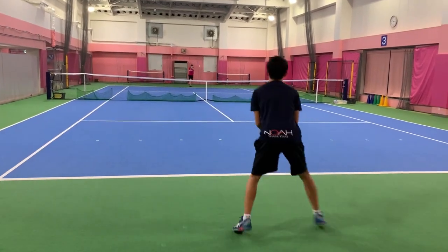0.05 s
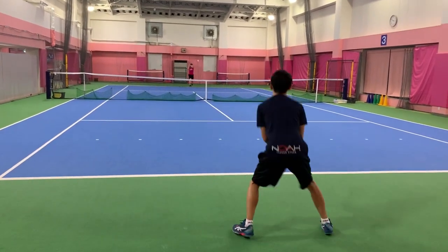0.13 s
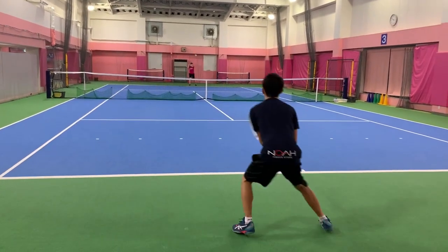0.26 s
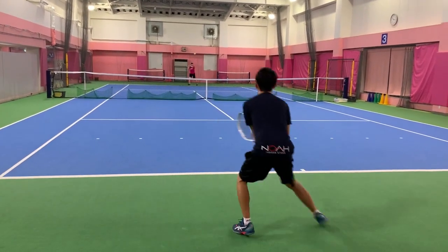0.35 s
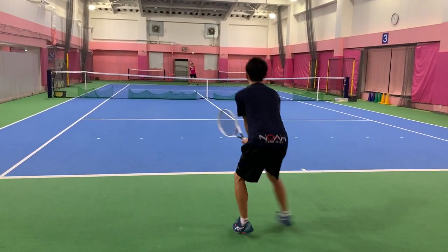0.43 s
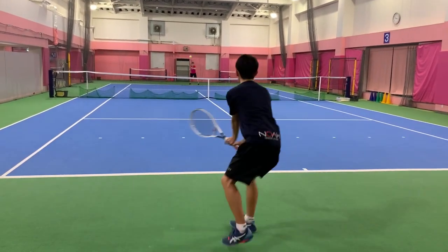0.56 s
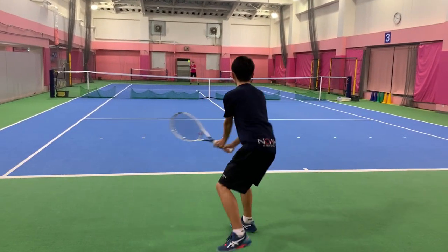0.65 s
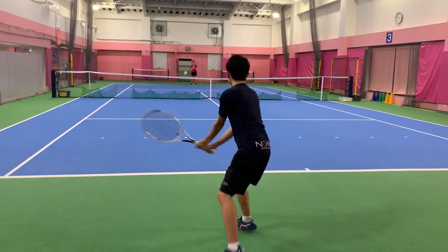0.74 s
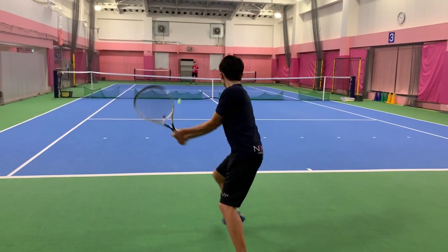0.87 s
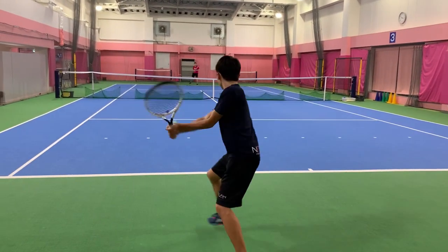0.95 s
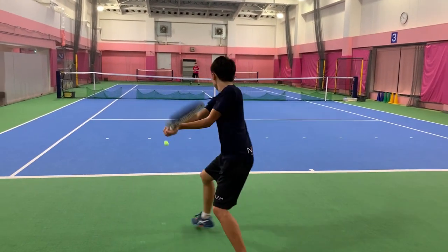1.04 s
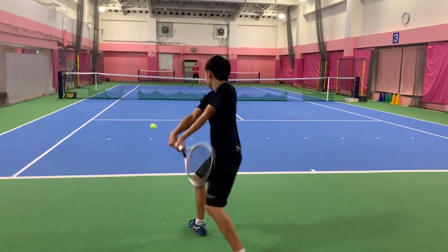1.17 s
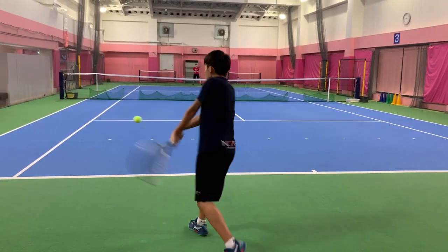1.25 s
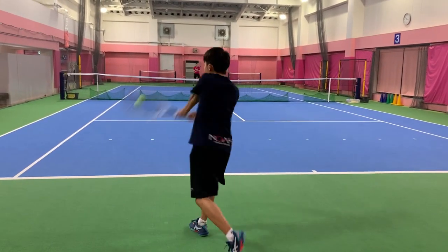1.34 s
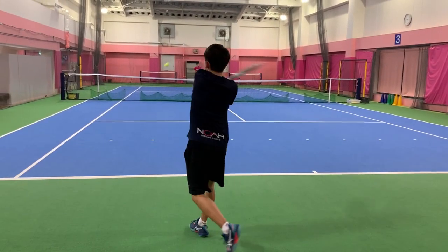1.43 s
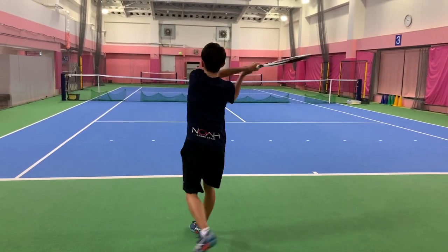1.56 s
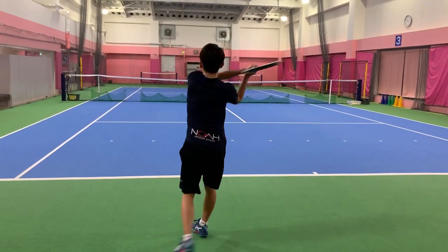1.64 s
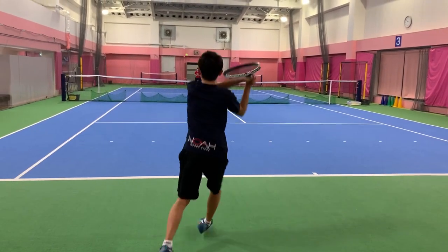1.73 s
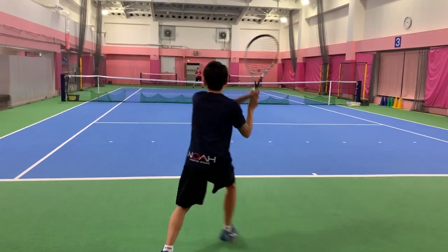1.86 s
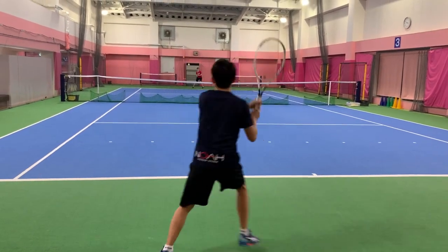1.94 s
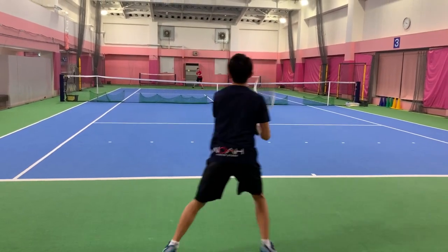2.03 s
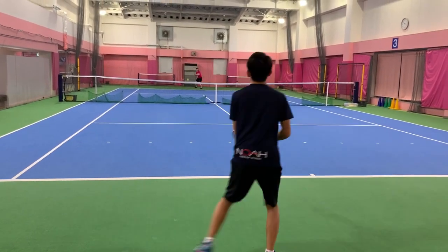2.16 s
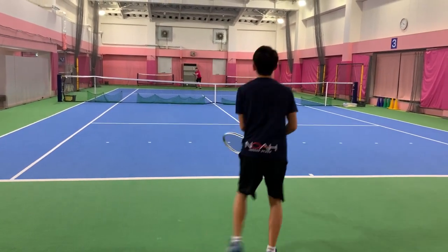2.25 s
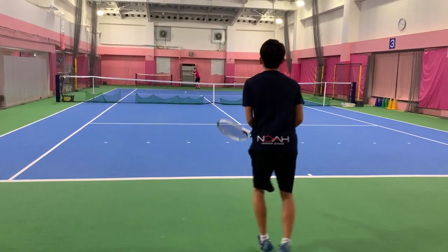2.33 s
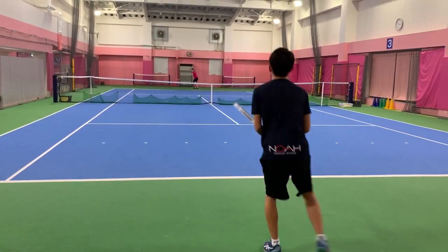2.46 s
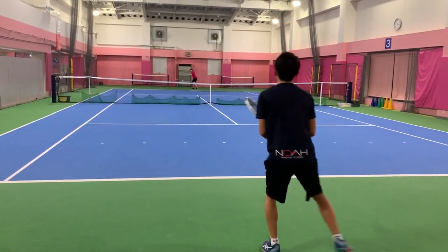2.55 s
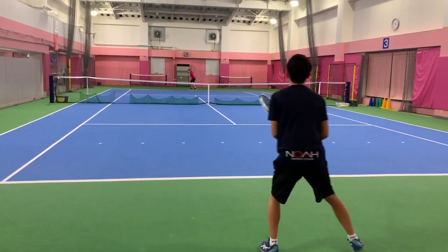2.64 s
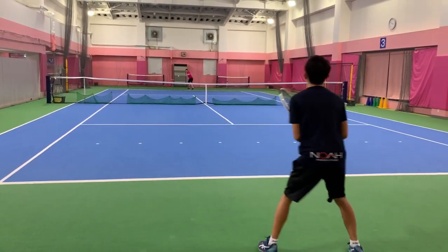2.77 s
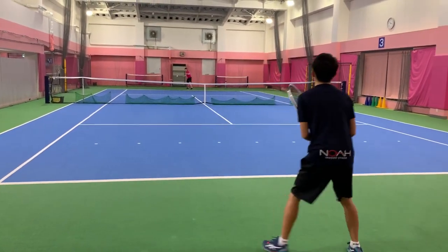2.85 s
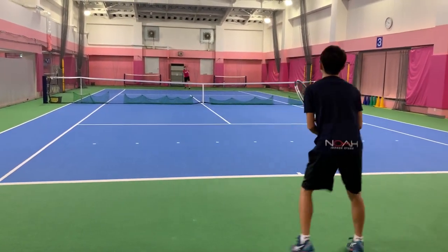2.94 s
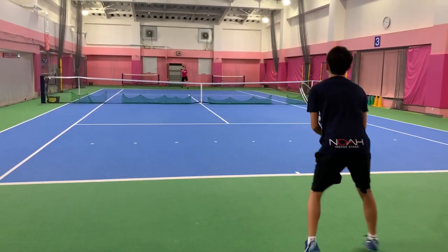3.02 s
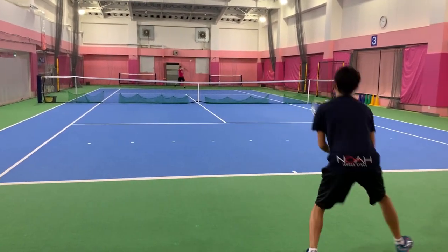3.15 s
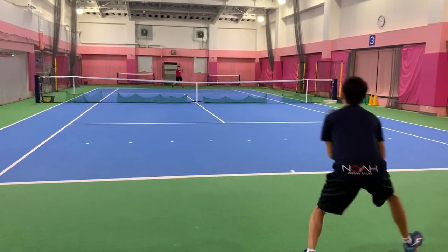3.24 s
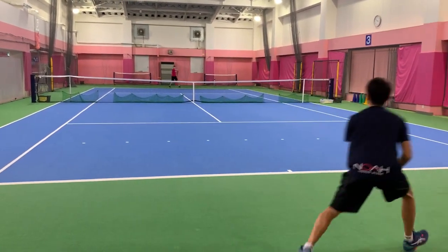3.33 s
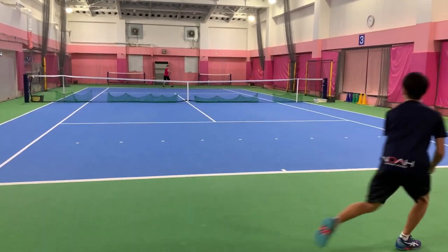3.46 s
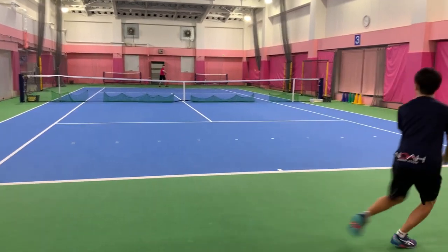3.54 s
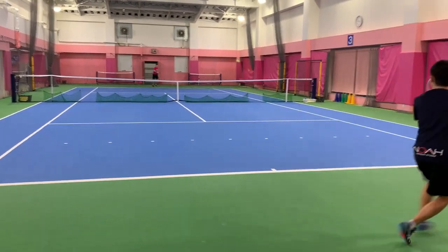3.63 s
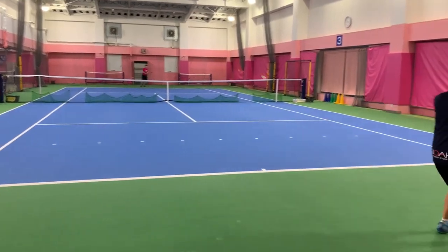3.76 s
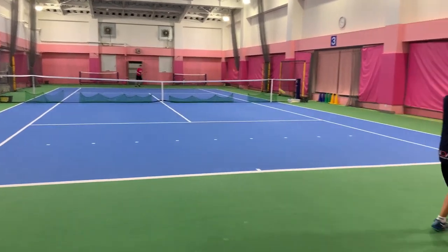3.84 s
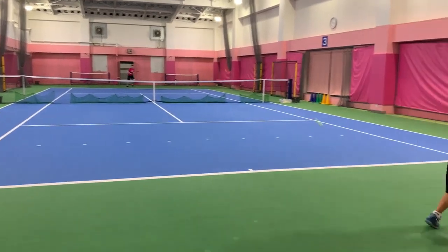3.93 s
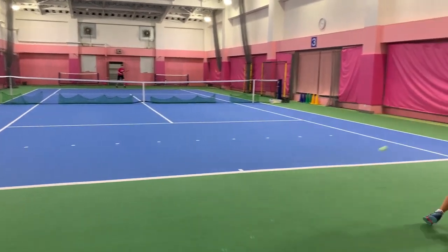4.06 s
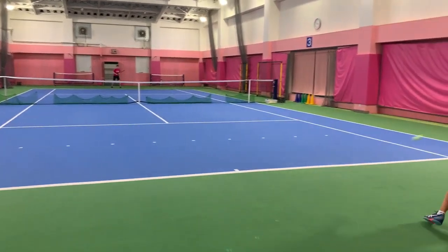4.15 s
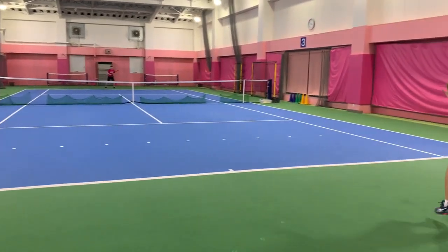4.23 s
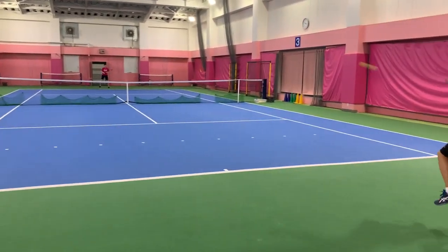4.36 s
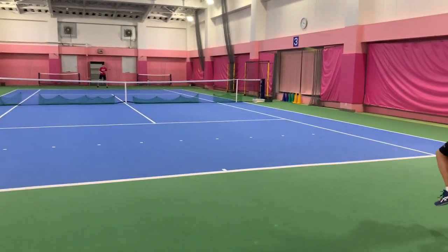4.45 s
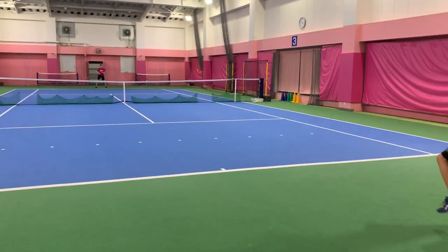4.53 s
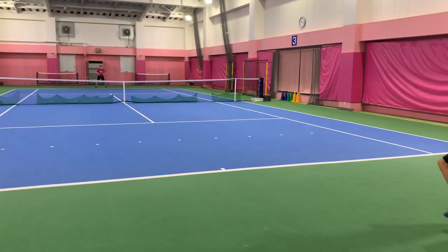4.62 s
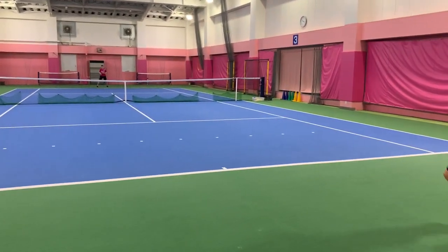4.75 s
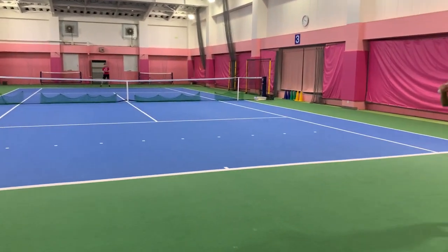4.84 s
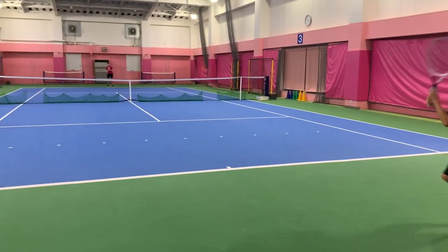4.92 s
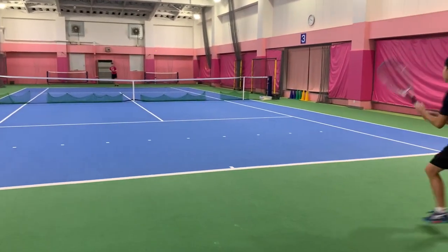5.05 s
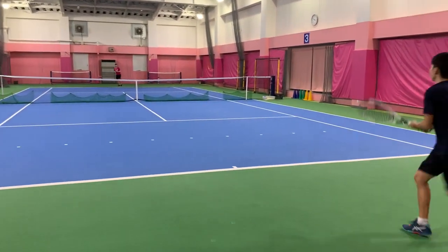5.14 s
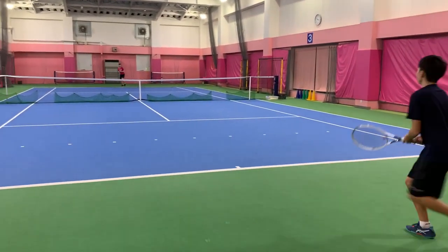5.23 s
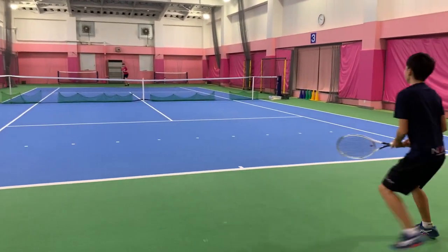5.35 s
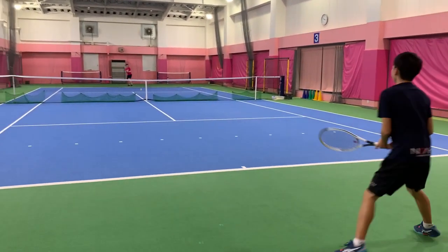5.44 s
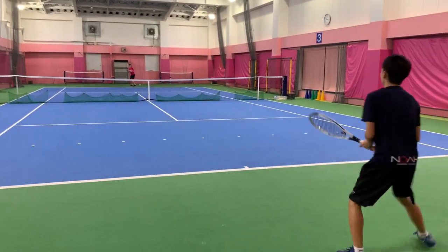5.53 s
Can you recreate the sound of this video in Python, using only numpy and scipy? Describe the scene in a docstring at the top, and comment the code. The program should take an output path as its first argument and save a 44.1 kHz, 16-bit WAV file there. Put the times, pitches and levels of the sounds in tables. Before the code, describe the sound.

A tennis rally is heard from behind the near baseline of a large, reverberant indoor hall, with a low ventilation hum throughout. Right at the start, a distant racket hits the ball with a hollow, echoing pop. The ball bounces nearby at about 1.1 seconds, hissing very faintly in flight, and the near player strikes it at 1.4 with a loud, crisp crack and thump. A footfall and scuff follow at 1.8. A faint far bounce comes at 2.5, then the distant racket knocks again at 3.1. The ball bounces on the near side at 4.1 and is hit at 4.4 with a bright pock and a brief ring of strings. Each stroke slaps off the walls and dies away over about two seconds. Soft footsteps pad throughout, ending with a few light sole scuffs between 5.2 and 5.6 seconds.

```python
"""Racket strokes of a tennis rally in a big indoor hall, heard from behind the near baseline.
Far and near players strike in turn. Each impact excites a thump of string bed and frame, the knock and
hollow pock of the ball, a short ring of the racket and a crack of felt; walls and a long reverberation
return them. The ball bounces and hisses in flight, shoes pad and scuff, and the ventilation hums."""
import sys
import numpy as np
from scipy import signal
from scipy.fft import rfft, irfft, next_fast_len
from scipy.io import wavfile
from scipy.ndimage import map_coordinates

SR = 44100
rng = np.random.default_rng(int(sys.argv[2]) if len(sys.argv) > 2 else 0)


def unload_wav(signal):
    """Save mono or channel-first audio to the path in sys.argv[1] as 16-bit WAV at rate SR, clipped to [-1, 1]."""
    wavfile.write(
        sys.argv[1],
        SR,
        np.round(np.clip(np.atleast_2d(signal).T, -1, 1) * 32767).astype(np.int16),
    )


N = 246512
BALL_HZ = 900  # the ball's pitch on the court


def rackets(critical_m=2.61, dwell_s=0.00334):
    """Impact excitation: felt cracks on the strings, then bed, frame and ball sound as they part."""
    # strokes: t/s, force/dB, bed f/Hz, frame f/Hz, frame level/dB, ball f/Hz, pock level/dB,
    # knock level/dB, lowest string f/Hz, favoured string f/Hz, its lift/dB, ping f/Hz, tilt/(dB/octave)
    strokes = [(0.0439, 0, 340, 171, -43.5, 997, -36, -29.5, 598, 3310, 9.5, 6040, -2.5),
               (1.3955, 3.5, 407, 160, -37.5, 959, -33, -42, 594, 1730, 0, 5900, -0.4),
               (3.0722, 2, 343, 166.6, -40.5, 980, -29.5, -25, 601.7, 1375, 4, 6000, -6.5),
               (4.3607, -1.8, 353, 217, -32.5, 942, -36.5, -44, 590.4, 2740, 9, 6500, -1)]
    # their paths: distance/m, thud gain into the hall/dB, direct crack gain/dB, wall delay/s,
    # wall gain/dB, end wall delay/s, end wall gain/dB, lag of the right channel/ms
    paths = [(25.4, -0.5, -4, 0.034, -1.5, .115, -11, 0.17), (4.27, -2, 3.5, 0.021, 2, 0.21, -10, 0.094),
             (19.9, -1, 2, 0.043, -5.5, .11, -16.5, 0.092), (9.1, -1.5, 6, .034, 0.5, 0.15, -13.5, -0.364)]
    out = np.zeros((2, N))
    dwell = round(dwell_s * SR)  # the ball's time on the strings
    for stroke, path in zip(strokes, paths):
        s, force_db, bed_hz, flex_hz, flex_db, ball_hz, pock_db, knock_db = stroke[:8]
        tuning_hz, favoured_hz, lift_db, ping_hz, tilt_db = stroke[8:]
        metres, boom_db, crack_db, wall_s, echo_db, end_s, end_db, lag_ms = path
        decades = np.log10(metres / critical_m)  # direct sound equals the echo at the critical distance
        direct_db = -19.5 * decades
        wall_db = 2.5 - 12.5 * decades + echo_db
        swell_s = 0.0018 * amp(1.15 * force_db)  # a harder stroke sinks deeper and thumps longer
        bed = amp(-30 + 0.66 * force_db) * thump(bed_hz, swell_s, push=0.25)
        frame = amp(flex_db) * thump(flex_hz, swell_s=0.0033, push=0)
        thud = np.roll(bed + frame, dwell)
        shell = thump(hz=1040, swell_s=0.0011, push=0.3)  # the ball's shell snaps back
        knock = amp(knock_db) * np.roll(shell, dwell)
        pock = amp(pock_db) * ball(ball_hz, start_s=0.002932, attack_s=0.0018)
        twang = amp(-46 + 1.46 * force_db) * strings(tuning_hz, favoured_hz, lift_db, tilt_db)
        click = amp(-37 + 0.11 * force_db) * crack(tilt_db)
        body = thud + pock + twang
        felt = amp(crack_db) * scrape(click, direct_db, ping_hz)
        direct = thud + knock + amp(-4) * (pock + twang) + felt
        add(out, s, placed(over_court(direct, direct_db), pan_db=0, lag_ms=lag_ms))
        add(out, s, amp(wall_db) * wall(body + amp(-9.5) * knock + click, wall_s))
        add(out, s, amp(end_db) * end_wall(body + click, end_s))
        # each part radiates in its own directions and so finds its own paths through the hall
        for part in (amp(boom_db) * thud, pock, twang, click):
            add(out, s, hall(part))
    return out


def thump(hz, swell_s, push):
    """Damped oscillation of a soft contact: a few cycles swell and die over a slower push of air."""
    t = clock(SR // 8)
    u = t / swell_s
    phase = 2 * np.pi * hz * (t - swell_s)
    return burst(u ** 2 * np.exp(-2 * u) * (np.sin(phase) + push * np.sin(phase / 2)))


def ball(hz, start_s, attack_s):
    """Resonance of a hollow ball: close, short-lived modes make the pock."""
    # ball modes: ratio to the pitch, level/dB, T60/s
    modes = [(0.811, -17, 0.074), (0.899, -10, 0.055), (0.999, -6.5, 0.06), (1.08, -8.5, 0.053),
             (1.19, -1, 0.014), (1.42, -17.5, 0.01)]
    return ring([(ratio * hz, db, t60) for ratio, db, t60 in modes], start_s, attack_s)


def strings(tuning_hz, favoured_hz, lift_db, tilt_db, band_octaves=0.12):
    """Normal modes: tension tunes them, the contact spot favours some, the stroke's tilt dulls the top."""
    # string and frame modes: f/Hz, level/dB, T60/s
    modes = [(597, -2, 0.09), (1518, -2, 0.037), (1729, -0.5, 0.035), (2025, -1.5, 0.018),
             (2353, -1, 0.034), (2652, -10.5, 0.031), (3148, -5.5, 0.045), (3385, -12.5, 0.029),
             (3777, -10.5, 0.042), (4500, -13, 0.045), (4770, -14, 0.038), (5950, -17, 0.013),
             (6240, -13.5, 0.013)]
    lift = lambda hz: lift_db * np.exp(-(np.log2(hz / favoured_hz) / band_octaves) ** 2)
    dulled = lambda hz: tilt_db * np.log2(max(hz / 2400, 1))
    ratio = tuning_hz / modes[0][0]
    tuned = [(hz * ratio, db + lift(hz) + dulled(hz), t60) for hz, db, t60 in modes]
    return ring(tuned, start_s=0.002022, attack_s=0.00023)


def ring(modes, start_s, attack_s):
    """Modal superposition: exponentially damped sines of alternating sign."""
    t = np.maximum(clock(SR // 8) - start_s, 0)
    tones = sum(amp(db - 60 * t / t60) * np.sin(2 * np.pi * hz * t) * (-1) ** k
                for k, (hz, db, t60) in enumerate(modes))
    return burst(tones * (1 - np.exp(-t / attack_s)))


def crack(tilt_db):
    """Impulse of first contact: each stroke's own tilt sets how bright or dull it sounds."""
    # the crack as heard, with a narrow dip near 11.8 kHz: f/Hz, level/dB
    spectrum = [(300, 13.5), (1200, 6.5), (2000, -7), (4200, -3.5), (6000, -7.5), (7300, -6.5), (9800, -5),
                (11800, -23), (13500, -3.5), (16000, -18)]
    colour = lambda hz: amp(along(spectrum, hz) + tilt_db * np.log2(np.maximum(hz, 2200)))
    return burst(filtered(signal.unit_impulse(SR // 8, SR // 2000), colour))


def scrape(click, direct_db, ping_hz, fade_s=0.0025, ping_db=15.5, half_width_hz=300):
    """Friction: dragging felt draws the click out and makes the strings ping; air absorbs the top."""
    # colour of the crack at close range: f/Hz, gain/dB
    close = [(2000, 1), (4500, 1.5), (5300, -1), (7300, -1.5), (8200, 0.5), (9500, 7), (13500, 10.5)]
    u = clock(len(click)) / fade_s
    noises = rng.standard_normal((2, len(u)))
    mid, side = [burst(noise * np.sqrt(u) * np.exp(-u)) / np.sqrt(SR) for noise in noises]
    fibres = np.array([mid + 0.5 * side, mid - 0.5 * side])
    dragged = signal.fftconvolve(click[None], fibres, axes=1)[:, :len(u)]
    ping = lambda hz: ping_db / (1 + ((hz - ping_hz) / half_width_hz) ** 2)
    return filtered(dragged, lambda hz: amp(along(close, hz) + ping(hz) + direct_db * (hz / 10000) ** 2))


def over_court(x, direct_db, delay_s=0.007):
    """Comb filtering: the court's reflection joins the direct sound, its share growing with distance."""
    reflection = amp(-11 - 0.3 * direct_db)
    return amp(direct_db) * filtered(x, lambda hz: 1 + reflection * np.exp(-2j * np.pi * hz * delay_s))


def wall(x, delay_s, corner_s=0.012, spread_s=0.0098):
    """Specular reflection from the wall behind the player and its corner; fittings scatter the rest."""
    # wall reflection: f/Hz, gain/dB
    colour = [(150, -15), (380, -12.5), (520, -3), (700, -4), (1000, -3), (1600, -7.5), (4000, -1.5),
              (8000, -11), (14000, -17.5)]
    reflected = filtered(x, lambda hz: amp(along(colour, hz) - 2 * (hz / 3000) ** 2))
    mirror = placed(reflected, pan_db=-3.5, lag_ms=0.038)
    out = np.zeros((2, SR // 2))
    add(out, delay_s, amp(-6.5) * mirror)
    add(out, delay_s + corner_s, amp(-7.5) * mirror)
    add(out, delay_s, amp(-3) * scattered(x, colour, spread_s, SR // 8))
    return out


def end_wall(x, delay_s, spacing_m=45, trip_db=-12.5):
    """Echo between the end walls: a soft, smeared slap, and a fainter one a round trip later."""
    # end wall reflection: f/Hz, gain/dB
    colour = [(150, -17), (400, -13), (700, -2), (1000, -6), (2000, -22), (4000, -12), (10000, -33.5)]
    trip_s = 2 * spacing_m / 343  # sound travels at 343 m/s
    out = np.zeros((2, SR))
    for trip in range(2):
        slap = scattered(x, colour, spread_s=0.017, count=SR // 4)
        add(out, delay_s + trip * trip_s, amp(trip * trip_db) * slap)
    return out


def scattered(x, colour, spread_s, count):
    """Scattering: a dense cluster of small reflections smears the sound in time."""
    u = clock(count) / spread_s
    cluster = diffuse(colour, count) * burst(u * np.exp(-u)) / np.sqrt(SR)
    return signal.fftconvolve(x[None], cluster, axes=1)


def hall(x, early_db=1, early_t60=0.83, build_s=0.0083):
    """Reverberation: strong early reflections, then a long tail whose treble dies first."""
    # reverberation time: f/Hz, T60/s
    decay_times = [(100, 2.5), (300, 2.23), (1000, 2.52), (2000, 1.86), (3300, 1.42), (5000, 0.99),
                   (8000, 0.44), (14000, 0.69)]
    # initial spectrum of the reverberation: f/Hz, gain/dB
    colour = [(100, -3.5), (250, 7), (500, 0), (690, 4.5), (1000, 6), (3000, 8.5), (6000, 11.5), (10000, 8),
              (14000, -7.5)]
    hz, t, spectra = signal.stft(diffuse(colour, 2 * SR), SR, nperseg=256)
    decay = amp(-60 * t / along(decay_times, hz)[:, None])
    early = np.sqrt(1 + amp(early_db - 60 * t / early_t60) ** 2)
    tail = signal.istft(spectra * decay * early, SR, nperseg=256)[1]
    tail *= 1 - np.exp(-clock(tail.shape[1]) / build_s)
    return signal.fftconvolve(x[None], tail, axes=1) / np.sqrt(SR)


def bounces(pock_db=-14):
    """Impact with sliding friction: the ball meets the court with a thud, a pock and a skidding slap."""
    # bounces: t/s, thud f/Hz, level into the hall/dB, skid re thud/dB, tilt/(dB/octave), skid time/s
    landings = [(1.0839, 165, -42.5, -22, -3.5, 0.0022), (4.1077, 276, -49, -10.5, -6, 0.0065)]
    # felt on the court: f/Hz, level/dB
    spectrum = [(300, -7.5), (1200, 3), (2800, 1), (4000, -12), (7000, -23.5), (14000, -29)]
    out = np.zeros((2, N))
    for s, hz, db, skid_db, tilt_db, skid_s in landings:
        u = clock(SR // 8) / skid_s
        colour = [(f, level + tilt_db * np.log2(max(f, 2500))) for f, level in spectrum]
        slap = burst(filtered(signal.unit_impulse(len(u), SR // 500), lambda f: amp(along(colour, f))))
        pock = amp(pock_db) * ball(BALL_HZ, start_s=0, attack_s=0.00088)
        body = thump(hz, swell_s=0.0068, push=0.36) + pock
        skid = burst(diffuse(colour, len(u))[0] * np.sqrt(u) * np.exp(-u))
        add(out, s, amp(db - 3.5) * placed(body + amp(skid_db) * skid, pan_db=-1, lag_ms=0))
        add(out, s, amp(db) * hall(body + amp(skid_db + 3.5) * slap))
    return out


def far_bounce(s=2.5, db=-55):
    """Reverberant field alone: the ball lands beyond the net and only the echo of its pock returns."""
    out = np.zeros((2, N))
    add(out, s, amp(db) * hall(ball(BALL_HZ, start_s=0, attack_s=0.001)))
    return out


def shoes(mean_gap_s=0.44, step_hz=296, step_db=-55):
    """Impact and friction: footfalls at set and at random times, and scuffs of rubber soles."""
    # footfalls at set times, two of them louder: t/s, f/Hz, level/dB
    set_steps = [(1.765, 254, -50), (2.977, 159, -54), (4.147, 171, -50.5), (4.748, 264, -54.5),
                 (4.908, 286, -55.5)]
    # scuffs: t/s, level/dB
    scuffs = [(1.761, -62.5), (3.765, -67), (5.189, -63.5), (5.503, -64), (5.58, -66)]
    # sliding sole: f/Hz, level/dB
    sole = [(800, 10), (2500, 7), (6000, 0), (9000, 1.5), (14000, -25)]
    thuds = np.zeros((1, N))
    times = (np.arange(20) + rng.random(size=20)) * mean_gap_s
    random_steps = [(s, step_hz, step_db) for s in times if s < (N - 1) / SR]
    for s, hz, db in set_steps + random_steps:
        add(thuds, s, amp(db) * thump(hz, swell_s=0.00635, push=0.21))
    rubbing = swells([(s, 0.025, db) for s, db in scuffs]) * unit(diffuse(sole, N))
    return placed(thuds[0], pan_db=-1.5, lag_ms=0) + hall(thuds[0])[:, :N] + rubbing


def flight():
    """Aerodynamic noise: the spinning ball hisses faintly on its way in."""
    # approaches: t/s, half length/s, level/dB
    approaches = [(1.2, 0.24, -67.5), (3.98, 0.49, -64)]
    # thin hiss: f/Hz, level/dB
    band = [(3000, -34.5), (4400, -5), (4850, -5), (5150, -1.5), (5400, -6), (5700, -15.5), (8000, -28.5)]
    return swells(approaches) * unit(diffuse(band, N))


def ventilation(rush_db=-38.5, waver=0.71, waver_hz=7):
    """Amplitude and phase modulation: low fan tones waver over steady broadband noise."""
    # steady background rush and hiss, with a narrow dip near 11.8 kHz: f/Hz, relative level/dB
    rush = [(15, -45.5), (25, -7.5), (53, -10), (112, -5), (142, -4), (301, -9), (326, -9.5), (394, -13),
            (621, -19), (879, -20), (1090, -23), (4040, -40.5), (10300, -63), (11800, -75.5),
            (13800, -59.5), (15500, -73.5)]
    # fan tones: f/Hz, level/dB
    tones = [(49.5, -47.5), (70, -51), (141, -48.5), (150.5, -46.5)]
    t = clock(N)
    wobble = lambda: waver * map_coordinates(rng.standard_normal(256), [t * waver_hz], mode="mirror")
    hum = sum(amp(db) * unit((1 + wobble()) * np.sin(2 * np.pi * hz * t + wobble())) for hz, db in tones)
    return amp(rush_db) * unit(diffuse(rush, N)) + hum


def diffuse(colour, count):
    """Diffuse-field noise: coherent at the two microphones in the bass, unrelated in the treble."""
    # coherence: f/Hz, left-right correlation
    coherence = [(60, 0.84), (200, 0.94), (400, 0.7), (1000, 0.21), (2400, -0.0067), (5000, -0.041),
                 (12000, 0.097)]
    angle = lambda hz: np.arccos(np.clip(along(coherence, hz), -1, 1)) / 2
    response = lambda hz: amp(along(colour, hz)) * np.array([np.cos(angle(hz)), np.sin(angle(hz))])
    mid, side = filtered(rng.standard_normal((2, count)), response)
    return np.array([mid + side, mid - side])


def placed(x, pan_db, lag_ms):
    """Localisation by level and time differences between the two microphones."""
    half = np.array([[.5], [-.5]])
    return amp(half * pan_db) * filtered(x, lambda hz: np.exp(2j * np.pi * hz * half * lag_ms / 1000))


def swells(rows):
    """An envelope of Gaussian swells."""
    return sum(amp(db) * np.exp(-((clock(N) - s) / half_s) ** 2) for s, half_s, db in rows)


def amp(db):
    """Decibels to gain."""
    return 10 ** (np.asarray(db) / 20)


def unit(x):
    """Scale to rms 1."""
    return x / np.sqrt(np.mean(x ** 2) + 1e-20)


def burst(x):
    """Scale to the energy of one second at rms 1."""
    return x / np.sqrt(np.sum(x ** 2) / SR + 1e-20)


def clock(count):
    """Times of count samples."""
    return np.arange(count) / SR


def along(points, hz):
    """Interpolate (f/Hz, value) points on a log frequency axis."""
    f, values = np.transpose(points)
    return np.interp(np.log(hz + 1), np.log(f + 1), values)


def filtered(x, response):
    """Linear filtering: multiply the spectrum of x by a frequency response."""
    size = x.shape[-1]
    padded = next_fast_len(size + SR // 4)
    return irfft(rfft(x, padded) * response(np.fft.rfftfreq(padded, 1 / SR)), padded)[..., :size]


def add(out, s, x):
    """Mix x into out from time s."""
    i = max(round(s * SR), 0)
    out[:, i:i + x.shape[-1]] += x[..., :N - i]


def scene():
    """Superposition of the rally and the hall's background."""
    return rackets() + bounces() + far_bounce() + shoes() + flight() + ventilation()


def record(dry, bass_hz=35, ceiling=0.93, top_hz=15700):
    """Transduction by two slightly unequal microphones: bass cut, soft clipping and a band limit."""
    # microphone imbalance: f/Hz, left minus right level/dB
    balance = [(300, -2), (900, 0), (3000, -1)]
    half = np.array([[.5], [-.5]])
    bass_cut = lambda hz: hz ** 3 / np.hypot(hz ** 3, bass_hz ** 3)
    x = filtered(dry, lambda hz: amp(half * along(balance, hz)) * bass_cut(hz))
    clipped = x / (1 + np.abs(x / ceiling) ** 8) ** (1 / 8)
    return filtered(clipped, lambda hz: 1 / (1 + (hz / top_hz) ** 80))


dry = scene()
out = record(dry)
unload_wav(out)
```